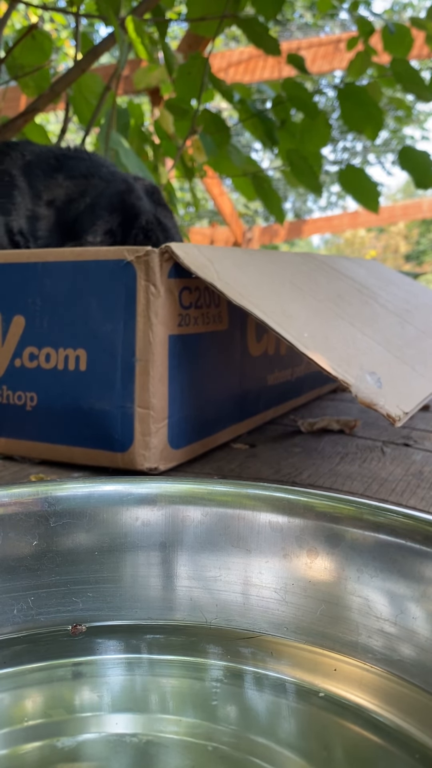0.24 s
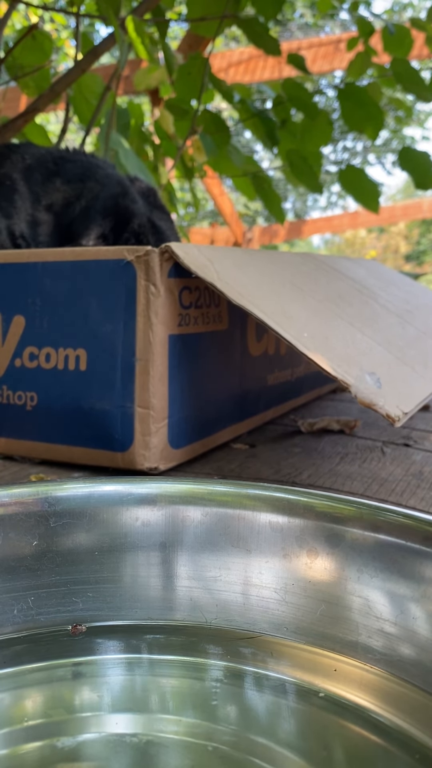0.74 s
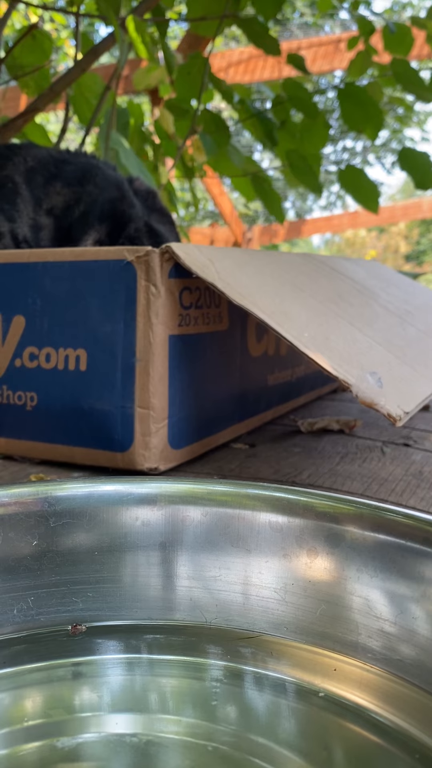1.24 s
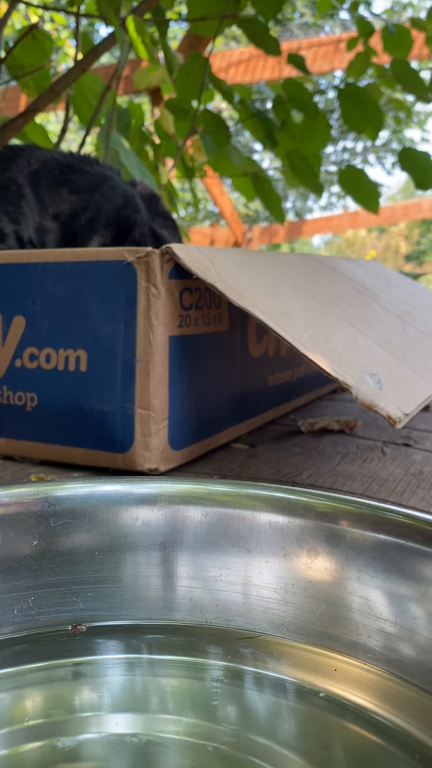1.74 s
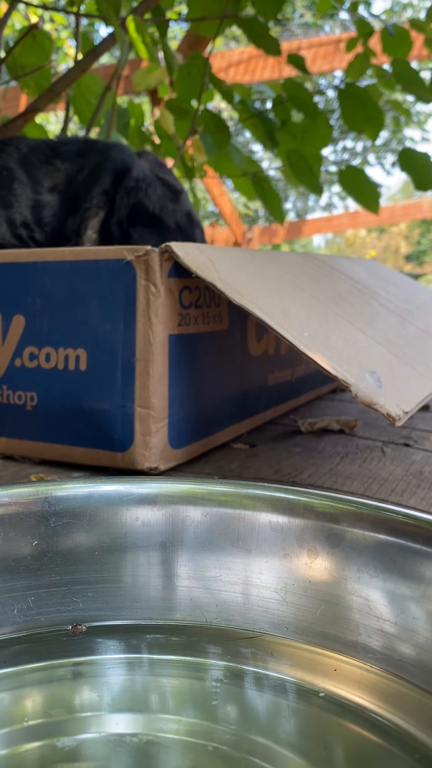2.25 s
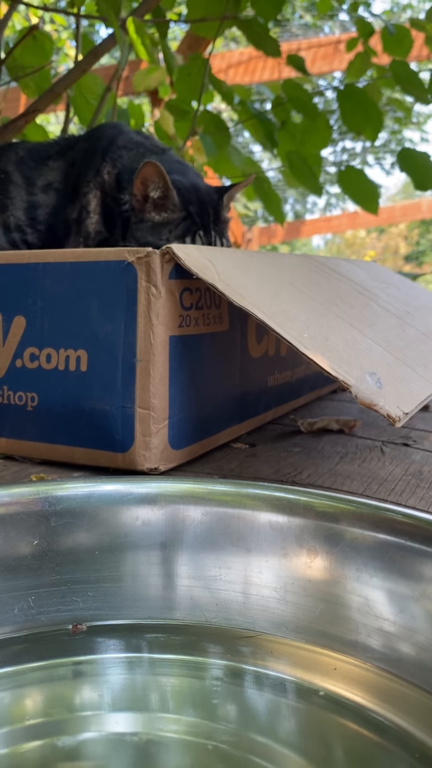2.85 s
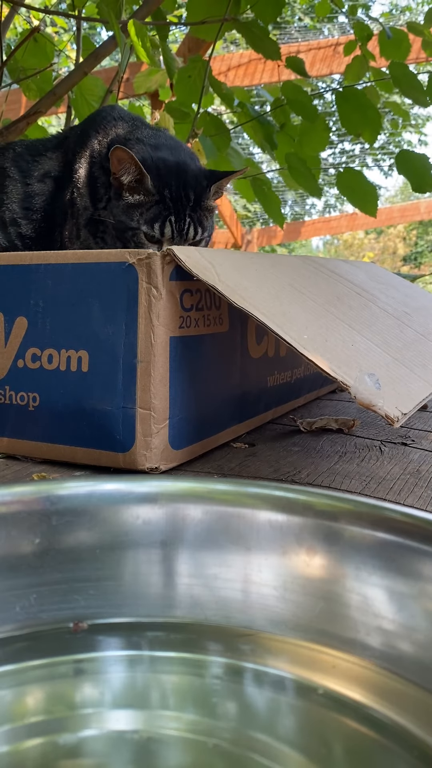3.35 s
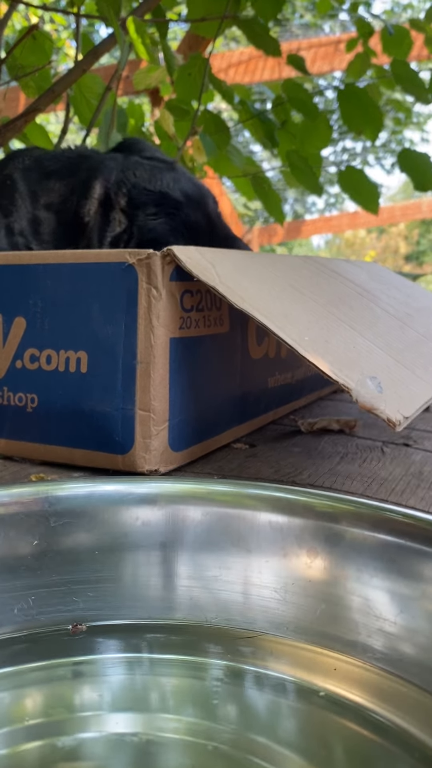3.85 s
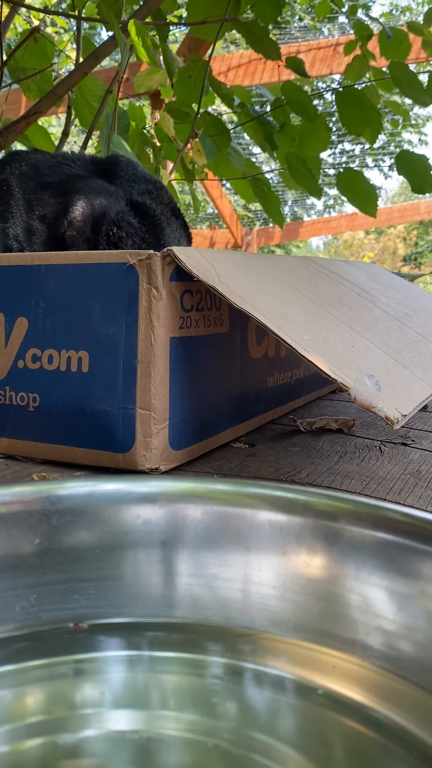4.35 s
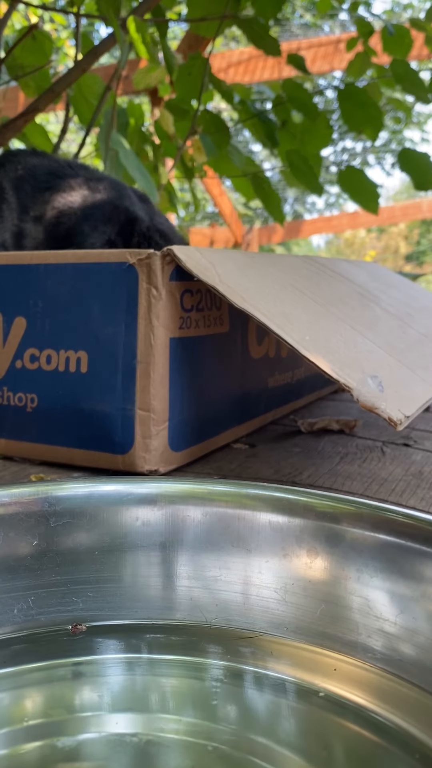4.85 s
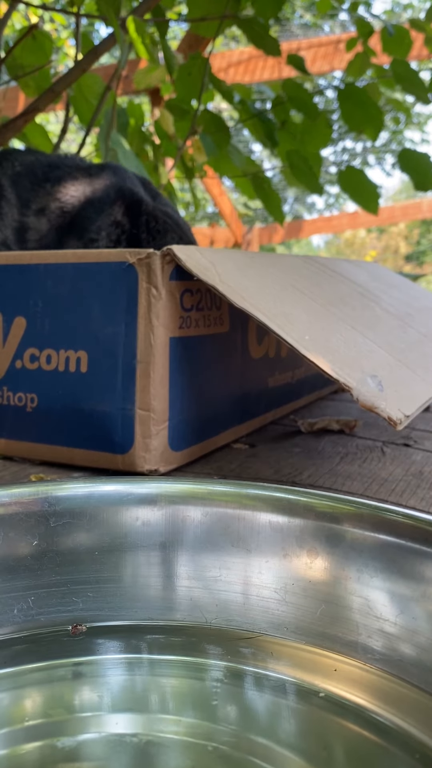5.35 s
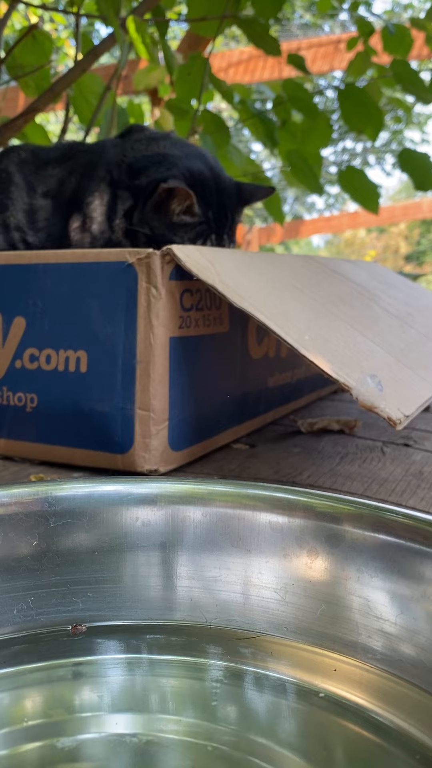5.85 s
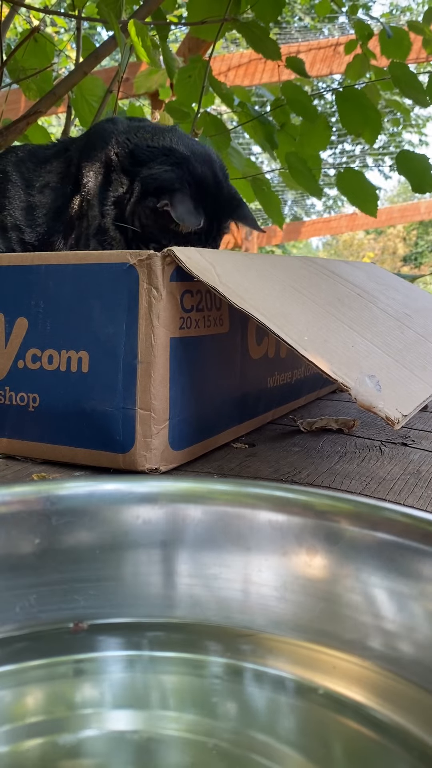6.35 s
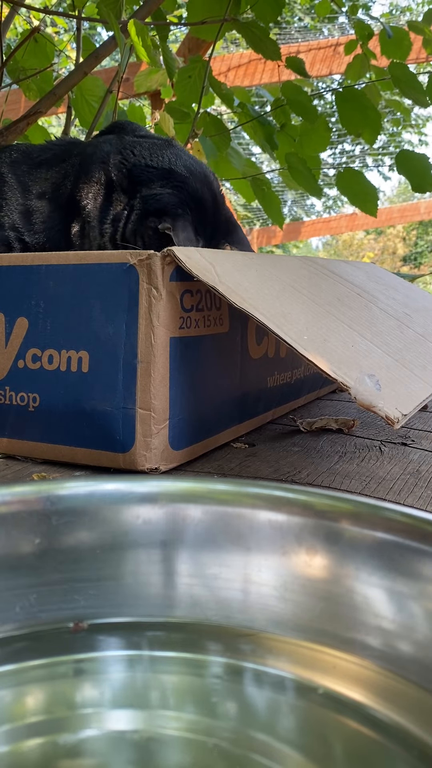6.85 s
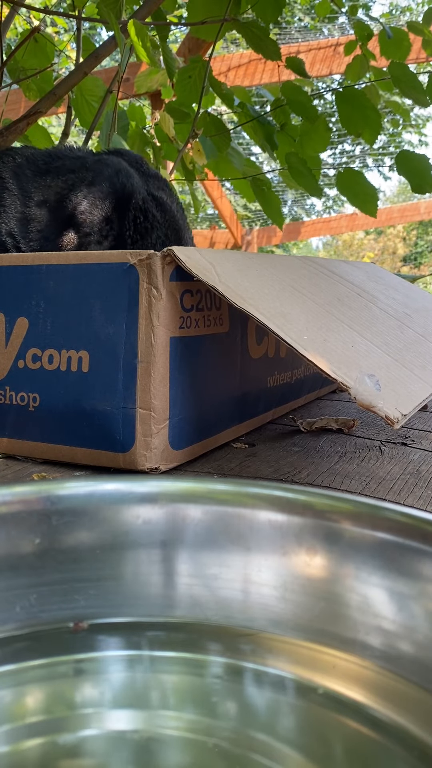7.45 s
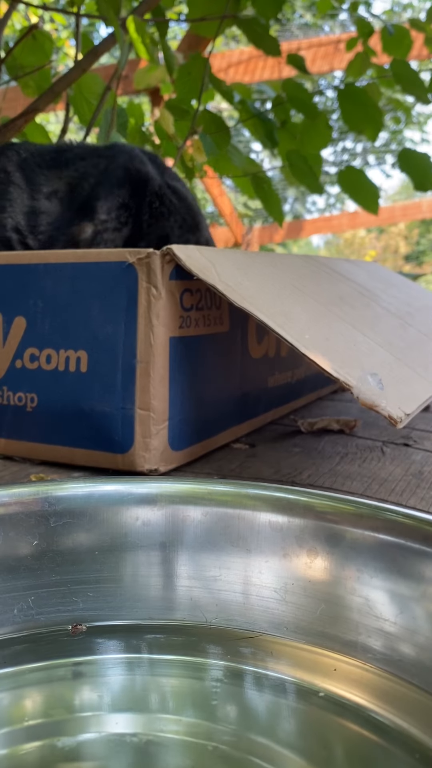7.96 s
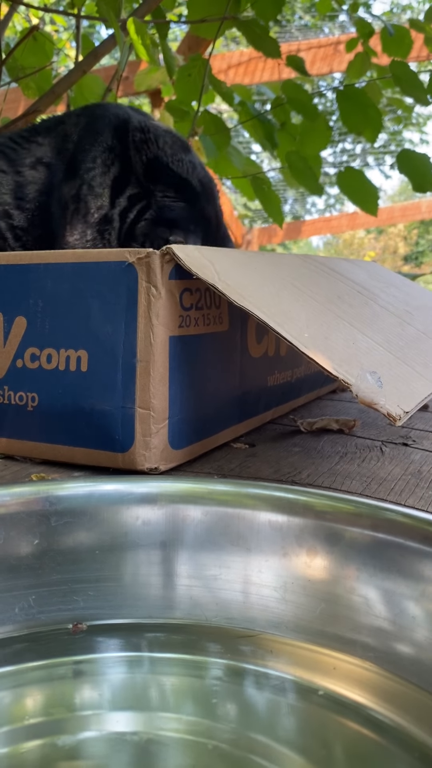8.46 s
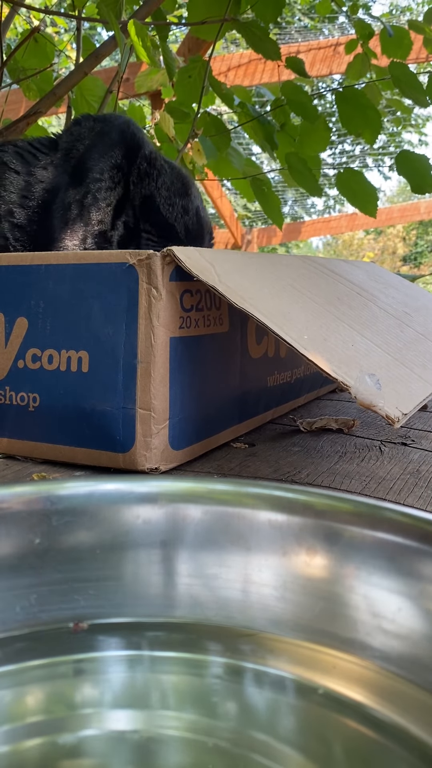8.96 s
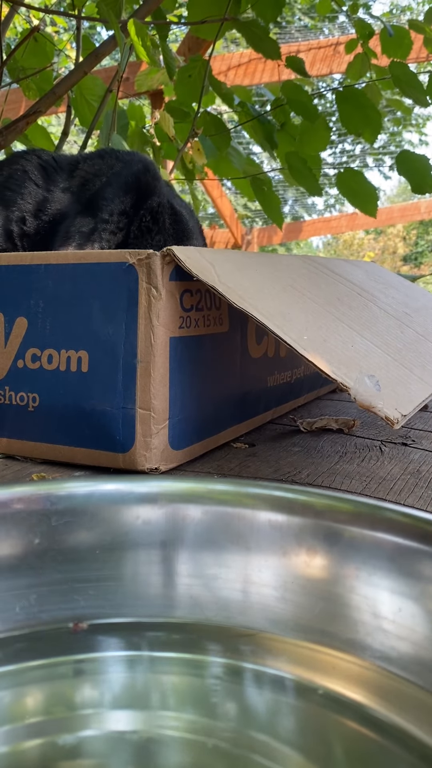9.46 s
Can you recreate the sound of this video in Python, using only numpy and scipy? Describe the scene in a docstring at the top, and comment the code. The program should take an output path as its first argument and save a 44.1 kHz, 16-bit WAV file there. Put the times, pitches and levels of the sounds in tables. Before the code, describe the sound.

Paws and fur rub and tap hollow cardboard on a wooden deck, light and irregular, with two sudden bursts of loud snapping and thudding.

```python
"""Fur brushes and paws scrape and tap a cardboard box as a cat rummages in it, outdoors on a wooden deck.
Over a faint steady hush, edges creak, claws crackle and scratch, and shifts of weight thump the boards.
Twice the cat leans so hard that walls snap through and crunch.
Rubbing is clumped slip noise, blows ring damped panel modes, thumps are swinging sines over deck modes.
Two close microphone ports pick it all up with scatter off the surroundings."""
import sys
import numpy as np
from scipy import signal
from scipy.fft import rfft, irfft, next_fast_len
from scipy.io import wavfile
from scipy.ndimage import uniform_filter1d, map_coordinates

SR = 44100
rng = np.random.default_rng(int(sys.argv[2]) if len(sys.argv) > 2 else 0)


def dump(signal):
    """Clip the signal to [-1, 1] and save it as 16-bit WAV at the path in sys.argv[1]."""
    limited = np.clip(np.atleast_2d(signal).T, -1, 1)
    pcm = np.round(limited * 32767).astype(np.int16)
    wavfile.write(sys.argv[1], SR, pcm)


N = 427769

# All event levels are relative drive levels within their layer.
# box flexing under the cat, low rumble: t/s, level/dB
FLEX_RUMBLE = [(0, -71), (1.2, -71), (1.7, -63), (2.2, -71), (3.2, -69), (4.0, -63.5), (4.9, -65),
               (7.6, -63), (9.7, -64)]
# paws, claws, head striking cardboard: t/s, level/dB, hollow/dB, sharp/dB (last two relative to the level)
BOX_TAPS = [(0.035, -44, -15, -19), (0.175, -42.5, -16, -19.5), (0.289, -46, -3, -12),
            (0.644, -49, -17, -37), (0.708, -48, -12, -20.5), (0.839, -50, -28, -27),
            (1.169, -40.5, -42, -22), (1.299, -36.5, -24, -14.5), (1.328, -38, 5, -20),
            (1.338, -54, 16.5, -26), (1.418, -40.5, -14, -18), (1.54, -53.5, -9.5, -32),
            (1.851, -41, -12.5, -18.5), (2.012, -35, -12, -16), (2.065, -45, -19, -16),
            (2.804, -60.5, -4, -17), (3.221, -55, -4, -46), (3.335, -50, -11, -28), (3.45, -45.5, 3.5, -17),
            (3.727, -35, 2, -14.5), (3.738, -34.5, 0, -7), (3.755, -27, -2, -18.5),
            (3.858, -45.5, -15, -18.5), (4.064, -36, -10.5, -16), (4.078, -39.5, -8, -17),
            (4.181, -37.5, -12, -11.5), (4.232, -52, 3, -3), (4.278, -37.5, -6.5, -3.5),
            (4.332, -45.5, -8.5, -11), (4.353, -43.5, -15, -14.5), (4.393, -67, -13, -10),
            (4.439, -81, -9, -0.5), (4.563, -37.5, -6, -5), (4.602, -28.5, -16, -7),
            (4.614, -33.5, -16, -12), (4.644, -41.5, -5, -23), (4.665, -45, 1, 1), (4.679, -30, -13, -11),
            (4.698, -36.5, 0, -16), (4.838, -61.5, -10, -8.5), (4.998, -45, -15, -16.5),
            (5.137, -41, -8, -22.5), (5.154, -50, -3, -25), (5.32, -40.5, -0.5, -15.5),
            (5.356, -45, -5, -11.5), (5.376, -38.5, -5, -19.5), (6.046, -46.5, 9.5, -45),
            (6.252, -53, 0, -32.5), (6.326, -37, -12.5, -9.5), (6.428, -51, 1, -39), (6.445, -52, 1.5, -26),
            (6.488, -48, -13, -30), (6.508, -43, -2.5, -26), (6.639, -37.5, 4, -18),
            (6.673, -36, -8.5, -19.5), (6.716, -38.5, -13, -48), (6.742, -35.5, -8, -34.5),
            (6.833, -35.5, -7, -27), (6.925, -31.5, -21.5, -14), (6.934, -36, -7, -13.5),
            (6.954, -13, -17, -8.5), (6.958, -14, -20, -4.5), (6.963, -19.5, -12, -9),
            (7.044, -40, 4.5, -2.5), (7.056, -40, 5.5, -7.5), (7.123, -29, -16, -28),
            (7.158, -32.5, -8.5, -23), (7.188, -25.5, -16, -22), (7.264, -39, -11, -23.5),
            (7.29, -34, -12.5, -29), (7.305, -37, -15, -31.5), (7.315, -36.5, -15, -19),
            (7.334, -31.5, -11.5, -29), (7.353, -33.5, -9, -21), (7.494, -31, -15, -21),
            (7.742, -35, -12, -20.5), (7.831, -45, 0.5, -13), (7.868, -47.5, 0, -24),
            (7.933, -41, -14, -22), (8.01, -46.5, -9, -34), (8.206, -52, -5, -33), (8.419, -36.5, -5, -22),
            (8.435, -34.5, -14.5, -26), (8.446, -41.5, -12, -17.5), (8.492, -49, -19, -26),
            (8.627, -50, -10.5, -13), (8.679, -45.5, -14, -25), (8.767, -46.5, -7, -5.5),
            (8.864, -52, -3, -28), (8.884, -51, -11, -25), (9.059, -32, 2, -18), (9.097, -45, -5, -15.5),
            (9.341, -61.5, -10, -12), (9.561, -48, -14.5, -15.5), (9.666, -40, 2, -24),
            (9.682, -48.5, 9, -9.5)]
# cardboard catching and slipping: t of height/s, level/dB, half width/s
EDGE_CREAKS = [(0.29, -34.5, 0.0026), (0.304, -46, 0.0056), (0.354, -50.5, 0.016), (0.571, -57, 0.019),
               (0.648, -48.5, 0.003), (0.721, -55, 0.005), (0.842, -37.5, 0.0027), (0.874, -45.5, 0.0085),
               (0.927, -49, 0.0095), (0.952, -50, 0.008), (1.029, -63, 0.0064), (1.306, -42.5, 0.0021),
               (1.332, -35.5, 0.0025), (1.424, -52, 0.0064)]
# shifts of weight: t/s, push level/dB, settled pitch of box floor f/Hz, rise/s, deck ring level/dB
WEIGHT_SHIFTS = [(0.782, -42.5, 87.6, .012, -46), (0.923, -39, 148, 0.015, -54),
                 (1.335, -28, 119, 0.0048, -36), (1.377, -44.5, 102, 0.016, -47),
                 (1.428, -41.5, 333, 0.0092, -73), (1.74, -59, 320, 0.015, -75),
                 (2.503, -40, 101.6, 0.014, -42.5), (2.561, -42, 124, 0.015, -77),
                 (2.575, -44, 300, 0.011, -73), (3.443, -51.5, 129, 0.012, -47),
                 (3.722, -29, 137.4, 0.013, -54.5), (3.766, -27, 87.2, 0.017, -28),
                 (4.628, -49.5, 199, 0.012, -69), (6.261, -55, 109, 0.016, -63.5),
                 (6.652, -51, 131, .013, -44), (6.955, -43, 135, .014, -50),
                 (6.964, -35, 239, 0.013, -60.5), (8.437, -57, 110, .02, -45),
                 (9.061, -49, 195, .011, -58.5), (9.069, -30.5, 89, 0.016, -26),
                 (9.67, -47, 175, .013, -57)]
# box panel modes: f/Hz, level/dB, undamped t60/s
PANEL_MODES = [(138, -14, .12), (230, -15, .10), (338, 2, .06), (400, 0, .055), (475, -7, .05),
               (545, -5, .05), (615, -1, .055), (710, 2, .06), (820, 0, .06), (950, -4, .06),
               (1115, -2, .055), (1240, -2, .055), (1305, 1, .06), (1365, -1, .055), (1545, -14, .06),
               (1740, 0, .055), (1925, -12, .06), (2385, -8, .06), (2660, -8, .07), (2780, -9, .07),
               (3080, -16, .06), (3295, -10, .07)]
# deck board modes: f/Hz, level/dB, t60/s
DECK_MODES = [(55, 2.5, 0.51), (45, -6, 0.18), (61.3, -0.5, 0.18), (80.5, -2.5, 0.45)]
# creaking flap modes: f/Hz, level/dB
FLAP_MODES = [(350, -3.5), (425, -8.5), (760, -12), (955, 3.5), (1250, -11.5), (1385, -13)]
# strokes along the box: start t/s, length/s, panel scrape level/dB, fur hiss level/dB
BOX_STROKES = [(0.02, 0.21, -71, -71.5), (0.285, 0.15, -70.5, -69), (0.416, 0.18, -71.5, -68),
               (0.819, .14, -65, -73), (1.156, 0.15, -66.5, -78), (1.321, 0.14, -64.5, -73.5),
               (1.74, 0.12, -72.5, -80), (1.912, 0.099, -57, -66), (2.062, .07, -67, -73),
               (2.19, 0.036, -84.5, -72.5), (2.299, 0.049, -59, -65), (2.391, 0.055, -62.5, -59),
               (2.487, 0.11, -62, -93), (3.009, 0.074, -62, -72), (3.239, 0.085, -71.5, -92),
               (3.612, 0.041, -54.5, -70.5), (3.726, 0.036, -48.5, -49.5), (3.82, 0.16, -75.5, -70),
               (3.964, 0.15, -55.5, -65), (4.178, .12, -53.5, -70.5), (4.311, 0.19, -75.5, -75.5),
               (4.559, 0.15, -57.5, -72), (4.91, 0.16, -58.5, -68), (5.11, 0.12, -59.5, -80),
               (5.342, 0.083, -57.5, -72), (5.603, 0.11, -69.5, -78), (5.719, 0.072, -56.5, -62),
               (5.878, 0.074, -65.5, -69.5), (6.047, .11, -73.5, -65.5), (6.214, 0.025, -57.5, -82),
               (6.331, 0.033, -58.5, -77), (6.467, 0.072, -68, -90), (6.651, 0.06, -54.5, -74.5),
               (6.962, 0.13, -58.5, -72.5), (7.268, .12, -62.5, -81.5), (7.697, 0.11, -62.5, -80),
               (7.82, 0.076, -63.5, -82.5), (8.032, 0.39, -68.5, -70), (8.118, 0.12, -56.5, -75.5),
               (8.427, 0.085, -60.5, -64), (8.619, 0.043, -61, -75.5), (8.709, 0.19, -56, -75.5),
               (9.358, 0.057, -79, -73.5), (9.62, 0.1, -59, -69)]
# claw tips drawn along a wall: middle t/s, level/dB, half length/s
CLAW_SCRATCHES = [(1.97, -63, 0.054), (4.036, -56, 0.062), (5.004, -62.5, 0.043), (5.13, -62.5, .04),
                  (7.398, -62.5, 0.013), (8.187, -83, .06), (8.817, -82, 0.095)]
# wall snapping through and springing back: t/s, level/dB, hollow/dB, sharp/dB, crisp/dB (relative to level),
# pitch of the spot f/Hz, share of the free ring time, spring-back delay/s, spring-back level re snap/dB
WALL_SNAPS = [(3.64, -15.5, -20, -2, -34.5, 1740, 0.88, 0.0042, -9.5),
              (3.669, -23, -9.5, 1.5, -30.5, 620, 0.88, 0.0063, -13.5),
              (3.764, -10.5, -7.5, -13.5, -31.5, 760, 0.55, .0077, -2),
              (6.954, -13.5, -25, -7.5, -30, 1310, .85, 0.0053, 2)]
# corrugated flutes crushing: t/s, level/dB, t60/s, pitch f/Hz
FLUTE_CRUNCHES = [(2.077, -45, 0.032, 4900), (3.644, -43, .04, 2500), (3.772, -42.5, 0.1, 2450),
                  (4.278, -39.5, 0.038, 4100), (4.389, -51.5, 0.091, 5100), (5.77, -68, .06, 3200),
                  (6.967, -39, 0.062, 2836), (6.995, -55, 0.18, 2750), (7.056, -54, 0.036, 4900),
                  (8.767, -59, 0.066, 3300)]
# noise spectrum shapes, relative: f/Hz, density/(dB per Hz)
# coarse scrape of the panels
SCRAPE_SHAPE = [(90, -23), (200, -2.5), (330, 5), (450, 7.5), (600, 8.5), (850, 1), (1080, -0.5),
                (1300, 3.5), (1600, -27), (1900, -13), (3000, -21), (6000, -46)]
# fur on cardboard
FUR_SHAPE = [(600, -28.5), (1700, -3.5), (2800, 5), (4000, 1.5), (5300, 4.5), (7000, -2.5), (10000, -0.5),
             (12500, -8.5), (15800, -8.5)]
# crack of a blow
CRACK_SHAPE = [(80, -20.5), (250, 12.5), (1300, 3.5), (1550, -12), (2200, -10.5), (4000, -14.5),
               (5300, -15), (7000, -22.5), (10000, -23.5), (15800, -35.5)]
# flexing box
RUMBLE_SHAPE = [(20, -36.5), (38, -12.5), (56, 6), (85, -1.5), (130, -4), (220, -10.5), (400, -16.5),
                (900, -55.5)]
# outdoor air
HUSH_SHAPE = [(20, -15.5), (55, -15), (120, -23), (300, -13), (700, -12.5), (2200, -18), (5000, -29.5),
              (10000, -56), (15800, -43)]
# skipping claws
CRACKLE_SHAPE = [(200, -24), (600, 1), (1300, -1), (2200, -9.5), (5000, -6), (10000, -23), (15800, -27)]
# port level difference: f/Hz, left minus right/dB
PORT_LEVEL = [(60, -1.5), (92, 2), (140, 1.5), (210, -1), (330, -1.5), (500, 2), (770, 5.5), (1170, 8.5),
              (1790, 0), (2740, -2), (4190, -1), (6410, 0.5), (9810, 0), (15000, -0.5)]
# port phase difference: f/Hz, lead of left over right/rad
PORT_PHASE = [(100, 0), (400, -.25), (800, -.45), (1300, -.55), (1800, -.6), (2840, 1.1), (4000, .9),
              (4800, .6), (5600, 1.2), (7300, 3.14), (9000, 4.8), (10400, 6.28), (12000, 7.9),
              (13500, 9.42), (16000, 12.2)]

LOW_CUT_HZ, TOP_HZ = 32, 15850
# stroke envelope: time to rise and to fall by 20 dB, lightening towards the ends
ATTACK_S, RELEASE_S, ARCH_DB = 0.046, 0.081, 3
ATTACK_SHARE = 0.57  # longest rise, as a share of stroke length
REST_SCRAPE_DB, REST_FUR_DB = -85.5, -83  # light leaning between strokes
FLEX_DB, FLEX_WAVER_DB, FLEX_FOLLOWS = 4, 4, 0.24  # offset, random swing, dB of rumble per dB of scrape
# light taps are crisp surface noise, heavy ones panel: offset, reference level, dB lost per dB of level
CRISP_DB, MIDDLING_DB, CRISP_FALLS = -2.5, -41, 0.58
# claw grains: rate, decay, level re stroke, range of sizes
CRACKLE_PER_S, CRACKLE_T60_S, CRACKLE_DB, CRACKLE_RANGE_DB = 80, 0.051, -5, 18.5


def amp(db):
    """Decibels to gain."""
    return 10 ** (np.asarray(db) / 20)


def unit(x):
    """x at rms 1."""
    return x / np.sqrt(np.mean(x ** 2) + 1e-20)


def along(points, hz):
    """(f/Hz, value) points joined on a log frequency axis."""
    f, v = np.transpose(points)
    return np.interp(np.log(hz + 1), np.log(f + 1), v)


def curves(rows):
    """One value per sample for each column after the time."""
    s, *cols = np.transpose(rows)
    return [np.interp(np.arange(N) / SR, s, c) for c in cols]


def wobble(rate_hz):
    """Smooth random curve with rate_hz knots a second."""
    knots = rng.standard_normal(int(N * rate_hz / SR) + 4)
    return map_coordinates(knots, [np.arange(N) * rate_hz / SR])


def filtered(x, response):
    """x times a complex response of frequency."""
    size = x.shape[-1]
    m = next_fast_len(size + SR // 10)
    return irfft(rfft(x, m) * response(np.fft.rfftfreq(m, 1 / SR)), m)[..., :size]


def coloured(x, spectrum, size=2048):
    """x through the minimum-phase filter of this spectrum, made by folding its cepstrum."""
    level_db = along(spectrum, np.fft.rfftfreq(size, 1 / SR))
    cepstrum = irfft(np.log(amp(level_db)))
    folded = np.r_[cepstrum[0], 2 * cepstrum[1:size // 2]]
    impulse = irfft(np.exp(rfft(folded, size)))
    return signal.fftconvolve(x, impulse)[:len(x)]


def band(x, lo_hz, hi_hz):
    """The part of x between two soft edges, at rms 1."""
    def response(hz):
        return 1 / np.sqrt((1 + (lo_hz / (hz + 1)) ** 8) * (1 + (hz / hi_hz) ** 8))
    return unit(filtered(x, response))


def add(track, s, sound):
    """Mix a sound into the track, starting at s seconds."""
    start = max(0, round(s * SR))
    track[start:start + len(sound)] += sound[:max(0, N - start)]


def friction(rate_hz, scatter_db, smooth, clump_db):
    """Tiny uneven slips in clumps, rate_hz a second, on a share of smooth noise."""
    onsets = rng.random(N) < rate_hz / SR
    signs = rng.choice([-1, 1], N)
    slips = onsets * signs * amp(scatter_db * np.clip(rng.standard_normal(N), -2, 1.5))
    grain = unit(slips) + smooth * rng.standard_normal(N)
    return unit(grain * amp(clump_db * np.tanh(wobble(130))))


def patchy(x, depth_db):
    """Shift the colour over time, as the rubbed spot moves over the panels."""
    z = signal.stft(x, nperseg=512)[2]
    field = uniform_filter1d(rng.standard_normal(z.shape), size=4, axis=0)
    field = uniform_filter1d(field, size=14, axis=1)
    return unit(signal.istft(z * amp(depth_db * unit(field)), nperseg=512)[1][:N])


def panel_ring(t, spot_hz=600, spot_db=3, damping=1.0, scatter_db=2.5, spread_rad=1.0, detune=0.0091):
    """Box modes: the touched spot favours those near one pitch; the paw scales their ring time."""
    hz, db, t60_s = np.transpose(PANEL_MODES)[:, :, None]
    # the cat's weight bends the walls and detunes them a little each time
    hz = hz * (1 + detune * np.tanh(rng.standard_normal(hz.shape)))
    favour_db = spot_db * np.exp(-(np.log2(hz / spot_hz) / .18) ** 2)
    start_db = db + favour_db + scatter_db * rng.standard_normal(hz.shape)
    size = amp(start_db - 60 * t / (t60_s * damping))
    phase = spread_rad * rng.standard_normal(hz.shape)
    return np.sum(size * np.cos(2 * np.pi * hz * t + phase), axis=0)


def blow(db, hollow_db, sharp_db, crisp_db, ring, crack_t60_s,
         tail_db=-24, tail_t60_s=0.37, crack_db=-10, push_db=-10, push_t60_s=0.0066):
    """One contact: push, crack and panel ring, weighed in four registers, after 10 ms of silence."""
    t = np.arange(len(ring)) / SR
    # fast decay, then a weak echo between the walls
    decay = amp(-60 * t / crack_t60_s) + amp(tail_db - 60 * t / tail_t60_s)
    crack = unit(coloured(decay * rng.standard_normal(len(t)), CRACK_SHAPE))
    push = unit(amp(-60 * t / push_t60_s))
    body = unit(ring) + amp(crack_db) * crack + amp(push_db) * push
    body, crack = np.pad([body, crack], [(0, 0), (SR // 100, 0)])
    hollow = amp(hollow_db - 18.0) * band(body, 175, 480)
    knock = amp(-30.5) * band(body, 540, 1650)
    snap = amp(sharp_db - 35.5) * band(body, 2100, 3700)
    crisp = amp(crisp_db - 18) * band(crack, 3000, SR / 2)
    return amp(db) * (hollow + knock + snap + crisp)


def dispersed(track, travel_s, early_s):
    """Bending waves are slower at low pitch (travel_s at 1 kHz), so every blow chirps downward."""
    advance_s = early_s + .01  # takes back the blow's leading silence
    def response(hz):
        return np.exp(2j * np.pi * (advance_s * hz - 2 * travel_s * np.sqrt(1000 * hz)))
    return filtered(track, response)


def hush(level_db=-77):
    """Still outdoor air: steady coloured noise, independent at each port."""
    return amp(level_db) * np.array([unit(coloured(rng.standard_normal(N), HUSH_SHAPE)) for _ in range(2)])


def thumps(deck_rise_s=0.056, sag=0.14, scuff_db=-12):
    """A soft push swings the box floor briefly with a dull scuff; the deck boards ring on below it."""
    track, t = np.zeros(N), np.arange(SR) / SR
    modes = sum(amp(db - 60 * t / t60_s) * np.sin(2 * np.pi * hz * t) for hz, db, t60_s in DECK_MODES)
    deck = (1 - np.exp(-t / deck_rise_s)) * modes
    for s, push_db, hz, rise_s, deck_db in WEIGHT_SHIFTS:
        # the pitch sags as the load settles
        swing = np.sin(2 * np.pi * hz * (t + sag * rise_s * (1 - np.exp(-t / rise_s))))
        scuff = amp(scuff_db) * band(rng.standard_normal(len(t)), hz / 2, hz * 2.0)
        push = t / rise_s * np.exp(1 - t / rise_s) * (swing + scuff)
        add(track, s, amp(push_db) * push + amp(deck_db) * deck)
    return track


def sniff(s=2.59, half_s=0.044, db=-61, lo_hz=2900, hi_hz=5400):
    """One short puff through the cat's nose: band noise under a flat-topped pulse."""
    t = np.arange(N) / SR
    return amp(db) * np.exp(-((t - s) / half_s) ** 4) * band(rng.standard_normal(N), lo_hz, hi_hz)


def creaks(rasp_db=-10, rasp_lo_hz=900, rasp_hi_hz=1850, grain_db=1.5, level_db=-4.0):
    """A catching edge judders in the modes of its flap and rasps unevenly."""
    t = np.arange(N) / SR
    grip = sum(amp(db) / np.cosh(np.clip((t - s) / half_s, -40, 40)) for s, db, half_s in EDGE_CREAKS)
    judder = sum(amp(db) * np.sin(2 * np.pi * hz * t + 1.7 * wobble(115)) for hz, db in FLAP_MODES)
    rasp = band(friction(rate_hz=380, scatter_db=4, smooth=.2, clump_db=3), rasp_lo_hz, rasp_hi_hz)
    gain = amp(level_db + grain_db * np.tanh(wobble(160)))
    return gain * grip * (judder + amp(rasp_db) * rasp)


def scratches(lo_hz=900, hi_hz=1600):
    """Claw tips drawn along a wall slip in a fine, dense grain."""
    t = np.arange(N) / SR
    pressure = sum(amp(db) * np.exp(-((t - s) / half_s) ** 4) for s, db, half_s in CLAW_SCRATCHES)
    return pressure * band(friction(rate_hz=200, scatter_db=4, smooth=.15, clump_db=3), lo_hz, hi_hz)


def crunches(rise_s=0.00066):
    """Crushed flutes give way in a dying run of tiny snaps around one pitch."""
    track, t = np.zeros(N), np.arange(SR // 4) / SR
    snaps = friction(rate_hz=700, scatter_db=4, smooth=.2, clump_db=2)
    for s, db, t60_s, hz in FLUTE_CRUNCHES:
        grain = band(snaps[round(s * SR):][:len(t)], hz, hz)
        add(track, s, amp(db - 60 * t / t60_s) * (1 - np.exp(-t / rise_s)) * grain)
    return track


def knocks(crack_t60_s=0.036, travel_s=0.0035, early_s=.0015):
    """A wall snaps through, then back with opposite sign; the close pair makes uneven resonances."""
    track, t = np.zeros(N), np.arange(SR // 4) / SR
    for s, db, hollow_db, sharp_db, crisp_db, spot_hz, damping, back_s, back_db in WALL_SNAPS:
        ring = panel_ring(t, spot_hz, spot_db=5, damping=damping, scatter_db=-1.5,
                          spread_rad=0.74, detune=0.015)
        snap = blow(db, hollow_db, sharp_db, crisp_db, ring, crack_t60_s, tail_db=-28.5, crack_db=-11.5)
        add(track, s, snap)
        add(track, s + back_s, -amp(back_db) * snap)
    return dispersed(track, travel_s, early_s)


def taps(crack_t60_s=0.05, damping=0.73, travel_s=0.0028, early_s=0.001102):
    """Single contacts with the panels, faint ticks to hard blows: a pad sounds hollow, a claw crisp."""
    track, t = np.zeros(N), np.arange(SR // 4) / SR
    for s, db, hollow_db, sharp_db in BOX_TAPS:
        # hollow: mid-panel, low modes; dry: near a stiff edge
        spot_hz = 600 * 2 ** (-hollow_db / 17)
        crisp_db = sharp_db + CRISP_DB - CRISP_FALLS * (db - MIDDLING_DB)
        ring = panel_ring(t, spot_hz, spot_db=7, damping=damping, scatter_db=3)
        add(track, s, blow(db, hollow_db, sharp_db, crisp_db, ring, crack_t60_s))
    return dispersed(track, travel_s, early_s)


def strokes():
    """Scrape and fur gains: each stroke sets in, arches and lets go; powers add to the resting contact."""
    scrape_power = np.full(N, amp(REST_SCRAPE_DB) ** 2)
    fur_power = np.full(N, amp(REST_FUR_DB) ** 2)
    for start_s, length_s, scrape_db, fur_db in BOX_STROKES:
        attack_s = min(ATTACK_S, ATTACK_SHARE * length_s)
        first_s = max(0, start_s - 2 * attack_s)
        t = first_s - start_s + np.arange(SR) / SR
        arch_db = ARCH_DB * (2 * np.clip(t / length_s, 0, 1) - 1) ** 2
        fade_db = 20 * (np.maximum(-t, 0) / attack_s + np.maximum(t - length_s, 0) / RELEASE_S)
        add(scrape_power, first_s, amp(scrape_db - arch_db - fade_db) ** 2)
        add(fur_power, first_s, amp(fur_db - arch_db - fade_db) ** 2)
    return np.sqrt(scrape_power), np.sqrt(fur_power)


def crackle():
    """Claws skipping over cardboard: random decaying noise grains of uneven size."""
    t = np.arange(SR // 20) / SR
    draws = rng.random((2, N))
    skips = (draws[0] < CRACKLE_PER_S / SR) * amp(CRACKLE_RANGE_DB * draws[1] ** 2)
    envelope = signal.fftconvolve(skips, amp(-60 * t / CRACKLE_T60_S))[:N]
    return unit(coloured(envelope * rng.standard_normal(N), CRACKLE_SHAPE))


def rubbing(ring_db=-9):
    """Paws scrape the panels in coarse slips, fur brushes in fine ones, claws crackle, the box flexes."""
    scrape_gain, fur_gain = strokes()
    flex_db, = curves(FLEX_RUMBLE)
    t = np.arange(SR // 4) / SR
    coarse = friction(rate_hz=340, scatter_db=4.5, smooth=.35, clump_db=3)
    fine = friction(rate_hz=3500, scatter_db=4, smooth=1, clump_db=1.5)
    # the coarse slips also ring the panels
    ring = unit(signal.fftconvolve(coarse, panel_ring(t))[:N])
    scrape = patchy(unit(coloured(coarse, SCRAPE_SHAPE)) + amp(ring_db) * ring, depth_db=3.5)
    # about thirty small random ticks a second roughen the fur hiss
    tick_onsets = friction(rate_hz=30, scatter_db=3, smooth=0, clump_db=0)
    tick = rng.standard_normal(len(t)) * amp(-60 * t / .02)
    ticks = unit(signal.fftconvolve(tick_onsets, tick)[:N])
    fur = patchy(coloured(fine + .12 * coarse + .25 * ticks, FUR_SHAPE), depth_db=2.5)
    rumble = unit(coloured(rng.standard_normal(N), RUMBLE_SHAPE)) * unit(scrape_gain ** FLEX_FOLLOWS)
    rumble_gain = amp(flex_db + FLEX_DB + FLEX_WAVER_DB * wobble(22))
    # claws skip most where a stroke is strong in both scrape and fur
    claws = amp(CRACKLE_DB) * np.sqrt(scrape_gain * fur_gain) * crackle()
    return scrape_gain * scrape + fur_gain * fur + claws + rumble_gain * rumble


def heard(x, echo_t60_s=0.096, echo_db=-4, count=3):
    """Two ports differ in level and phase by frequency; scatter off the deck and a steel bowl follows."""
    sides = np.array([[1], [-1]])
    t = np.arange(SR // 8) / SR
    echo = np.zeros((2, N))
    # several random scatter tails fade in and out, so the echo keeps no fixed colour
    for _ in range(count):
        scatter = rng.standard_normal((2, len(t))) * amp(-60 * t / echo_t60_s)
        scatter = scatter / np.linalg.norm(scatter[0])
        fed = x * np.tanh(2 * wobble(9))
        echo += signal.oaconvolve(fed[None], scatter, axes=1)[:, :N]
    # small obstacles scatter long waves less
    echo = filtered(echo / np.sqrt(count), lambda hz: amp(echo_db) * (hz + 80) / (hz + 450))

    def port_response(hz):
        return amp(sides * along(PORT_LEVEL, hz) / 2) * np.exp(1j * sides * along(PORT_PHASE, hz) / 2)
    return (filtered(x, port_response) + echo) / np.sqrt(1 + amp(echo_db) ** 2 / 2)


def scene():
    """Hush, thumps, creaks from an edge to the left, and the box sounds, each with its own scatter."""
    cardboard = rubbing() + scratches() + sniff() + taps() + crunches()
    floor = heard(thumps(), echo_db=-6.5)
    edge = heard(creaks(), echo_db=-1.5) * amp([[1], [-1.5]])
    walls = heard(knocks(), echo_t60_s=0.046, echo_db=-9.5)
    return hush() + floor + edge + heard(cardboard) + walls


def record(dry):
    """Thin the deepest bass with a second-order high-pass and drop everything above the band limit."""
    high_pass = signal.butter(2, LOW_CUT_HZ, "high", fs=SR, output="sos")
    thinned = signal.sosfilt(high_pass, dry)
    return filtered(thinned, lambda hz: hz < TOP_HZ)


dry = scene()
out = record(dry)
dump(out)
```